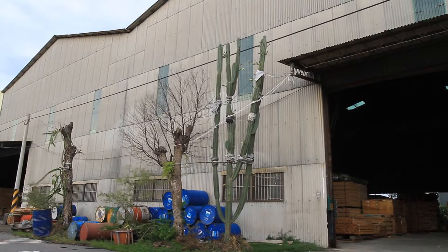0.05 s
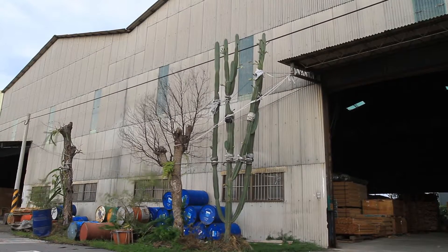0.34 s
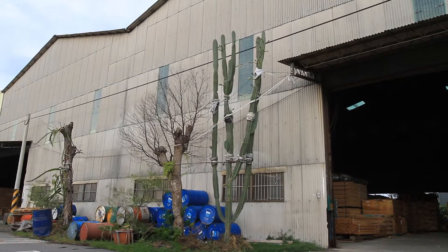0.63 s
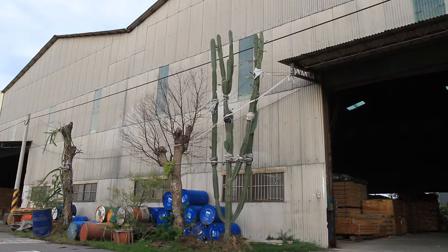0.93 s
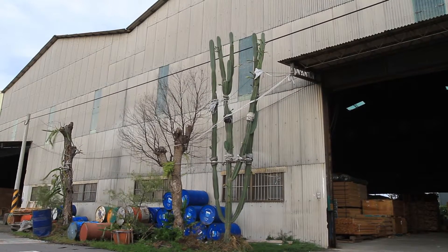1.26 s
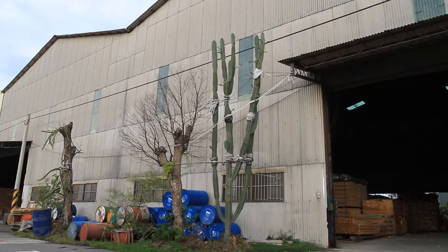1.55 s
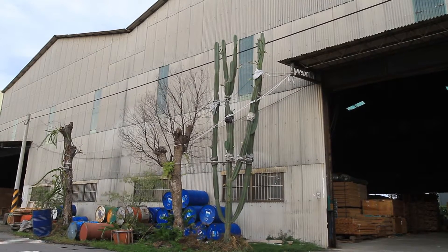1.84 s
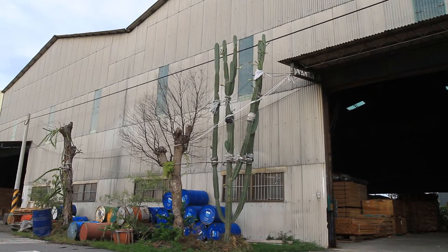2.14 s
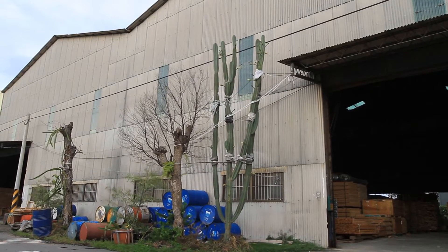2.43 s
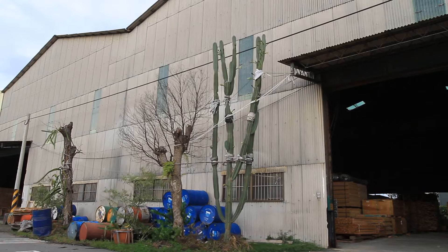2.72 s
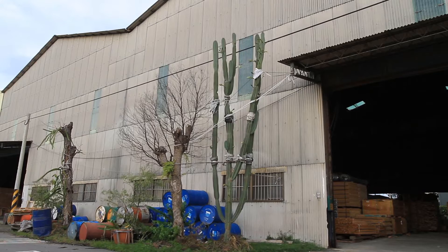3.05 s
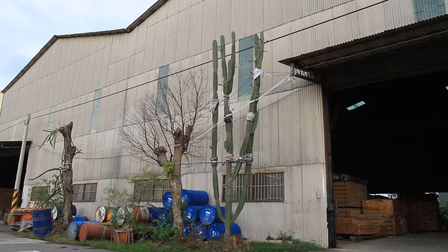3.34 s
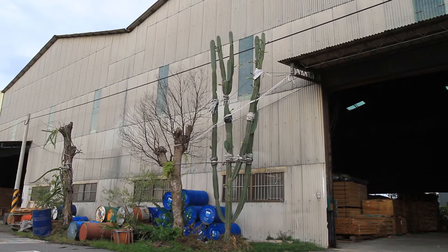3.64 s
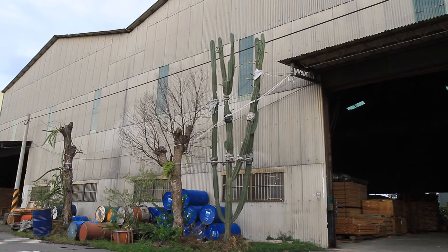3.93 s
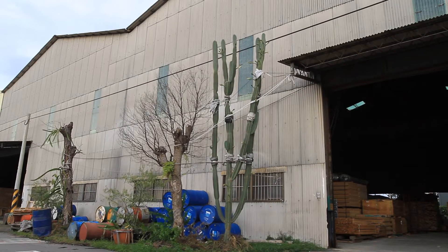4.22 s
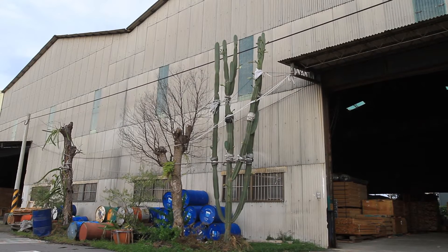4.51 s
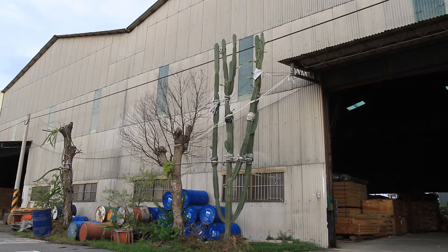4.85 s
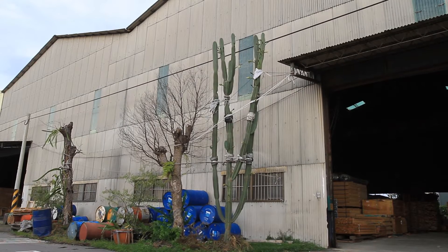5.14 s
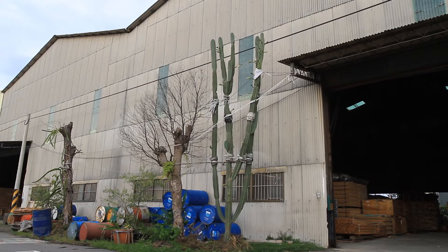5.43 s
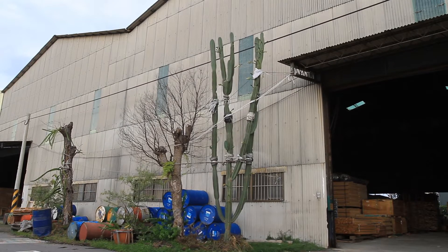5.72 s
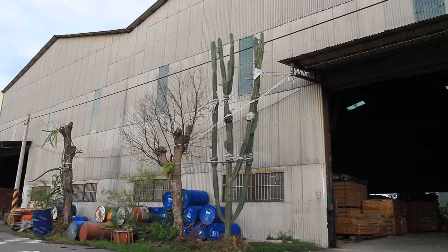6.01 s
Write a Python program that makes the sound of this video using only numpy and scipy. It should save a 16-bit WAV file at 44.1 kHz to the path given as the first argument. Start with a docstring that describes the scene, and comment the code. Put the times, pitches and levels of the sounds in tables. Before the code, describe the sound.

Gusty wind thumps the microphone outside a warehouse, over a distant whining circular saw and bursts of scraping, squeaking metal.

```python
"""Gusts thump and rumble right on the microphone, out in the yard before an open sheet-metal timber shed.
Farther off, inside, a circular saw whistles as it idles and three times sags in pitch as it bites,
its teeth striking a tone and its chips a rasp. Dragged metal scrapes, sliding metal squeaks,
and the shed rings with it all. Behind lie the shed's dull din and the hiss of wind
through branches and dry leaves. Both channels carry the same sound over their own faint hiss."""
import sys
import numpy as np
from scipy import signal
from scipy.fft import rfft, irfft, next_fast_len
from scipy.io import wavfile
from scipy.ndimage import uniform_filter1d, minimum_filter1d

SR = 44100
rng = np.random.default_rng(int(sys.argv[2]) if len(sys.argv) > 2 else 0)


def int16_out(signal):
    """Quantize to a 16-bit WAV file."""
    q = np.round(np.clip(np.atleast_2d(signal).T, -1, 1) * 32767)
    wavfile.write(sys.argv[1], SR, q.astype(np.int16))


N = 272097
TIME = np.arange(N) / SR
SIZE = next_fast_len(N, True)
BINS = np.fft.rfftfreq(SIZE, 1 / SR)

# Levels in the tables are relative; each source adds its own gain.
# ring of the shed (frequency [Hz], time to fall by 60 dB [s])
SHED_DECAY = [(200, 0.27), (2000, 0.43), (5000, 0.85), (10000, 0.38), (16000, 0.11)]
# din of the shed, heard from the yard (time [s], level [dB])
DIN_LEVEL = [(0, -49), (.16, -42), (.45, -59.5), (.62, -51.5), (.95, -50.5), (1.06, -43.5), (1.3, -51.5),
             (1.72, -45), (2.03, -46.5), (2.35, -56), (2.78, -59.5), (2.98, -51.5), (3.45, -56),
             (3.62, -50), (3.88, -55.5), (4.25, -58.5), (4.55, -48.5), (4.72, -51.5), (5.17, -49),
             (5.38, -43), (6.17, -38)]
# spectrum of the din (frequency [Hz], level [dB])
DIN_SPECTRUM = [(60, -3.5), (250, 2.5), (500, 2), (780, -0.5), (1020, 0), (1300, -4), (1900, -9),
                (2800, -16), (3900, -17), (5200, -28.5), (15000, -52.5)]
# gusts in the branches (time [s], level [dB], half length [s])
BRANCH_GUSTS = [(.13, -62.5, 0.12), (.75, -71, .17), (1.07, -59.5, 0.084), (1.5, -65, 0.12),
                (2.19, -65.5, 0.062), (2.62, -71.5, .1), (3.15, -71, 0.15), (3.9, -69, 0.17),
                (4.28, -69.5, .15), (5.08, -71.5, .19), (5.53, -64.5, 0.27), (6.1, -57, 0.18)]
# hiss of the branches (frequency [Hz], level [dB])
BRANCH_SPECTRUM = [(500, -4.5), (1300, -13.5), (2100, 3.5), (2900, -1), (4000, -2), (5000, -8),
                   (7000, -15.5), (9000, -20.5), (12000, -26), (15500, -31.5)]
# flurries of dry leaves (time [s], level [dB], half length [s])
LEAF_FLURRIES = [(.13, -72, 0.023), (5.28, -75, .04), (5.45, -70, .07), (5.5, -64, 0.017), (5.58, -71, .04)]
# hiss of the leaves (frequency [Hz], level [dB])
LEAF_SPECTRUM = [(4000, -39), (8000, -10), (10800, 4), (13000, -2), (15500, -4)]
# squeaks of sliding metal (centre time [s], length [s], pitch [Hz], level [dB], pitch scatter [Hz])
METAL_SQUEAKS = [(1.06, 0.056, 2950, -53, 30), (1.238, .08, 5700, -64, 220),
                 (1.255, 0.12, 3810, -49.5, 150), (1.269, .14, 1290, -59, 29), (1.312, 0.15, 1980, -63, 46),
                 (1.39, 0.11, 5800, -60, 250), (1.406, 0.066, 3454, -46, 172), (1.53, .05, 5440, -58, 90),
                 (2.954, .09, 1480, -53, 22), (4.96, 0.11, 8780, -81, 57), (5.101, 0.077, 3550, -60, 35),
                 (5.133, 0.15, 3010, -58, 40), (5.19, 0.092, 8850, -78, 70),
                 (5.389, 0.33, 1060, -44.5, 47.3), (5.737, .025, 3650, -34.5, 95),
                 (5.794, .028, 3540, -30, 92), (5.91, 0.058, 3330, -44, 100),
                 (6.147, 0.068, 3360, -43.5, 161)]
# drags over metal (start [s], length [s], level [dB], brightness [dB/octave])
METAL_DRAGS = [(1.124, 0.11, -38, 1.1), (1.335, 0.092, -38.5, 1.7), (5.674, 0.13, -28, 0),
               (5.82, 0.2, -34.5, 0), (6.006, 0.084, -28.5, 0)]
# spectrum of a scrape (frequency [Hz], level [dB])
SCRAPE_SPECTRUM = [(120, 6), (300, -1), (560, 3), (820, -4.5), (1050, 1), (1500, -2), (2200, -3.5),
                   (2750, -12.5), (3500, -13), (4300, -16.5), (5500, -26.5), (7500, -35.5), (10000, -43),
                   (15000, -52)]
# resonances of the scraped metal (frequency [Hz], width [Hz], level [dB])
METAL_MODES = [(961, 37, 1), (1600, 44, -16.5), (2205, 46, -3), (3220, 210, -4), (3680, 160, 6)]
# whistle of the free-running blade (time [s], level [dB])
IDLE_WHISTLE = [(0, -56), (.4, -73.5), (1.4, -71), (2.7, -76), (3.03, -62.5), (3.4, -81), (4.55, -66),
                (4.8, -64), (6.17, -60)]
# cuts of the saw (start [s], length [s], attack [s], grazing tone [dB], deep tone [dB],
# grazing rasp [dB], deep rasp [dB], fade [dB/s], time the blade sings [s])
SAW_CUTS = [(1.421, .65, 0.065, -53.5, -51, -59, -50.5, 3.5, 1.79),
            (3.35, 0.6, .04, -56, -50, -57, -51, 13.5, 3.79),
            (5.859, 0.27, 0.073, -57, -53, -65, -47.5, 2, 6.2)]
# tooth tone at first touch, a row per cut (harmonic 1 [dB], ..., harmonic 7 [dB])
GRAZE_HARMONICS = [(1, -14, -25, -23, -22, -24, -35), (-4, -9, -9.5, -20, -26, -25, -27),
                   (11, -13, -14, -13, -13, -24, -29)]
# tooth tone deep in the work, a row per cut (harmonic 1 [dB], ..., harmonic 7 [dB])
BITE_HARMONICS = [(1, -5, -16, -16, -23, -25, -32), (-1, -15.5, -19, -17, -16.5, -18, -28),
                  (-1.8, -10, -7, -20, -20, -23, -32)]
# side tones of unequal teeth (frequency [multiple of the tooth rate], level [dB])
UNEVEN_TEETH = [(12 / 9, -18), (14 / 9, -15), (15 / 9, -18), (16 / 9, -18), (21 / 9, -21), (23 / 9, -22),
                (24 / 9, -19), (30 / 9, -25), (33 / 9, -24), (42 / 9, -27), (51 / 9, -28), (60 / 9, -35)]
# rasp of the chips (frequency [Hz], level [dB])
RASP_SPECTRUM = [(500, -10), (1500, -8.5), (2200, 10), (2900, -1), (3900, 4.5), (5000, -7.5), (6500, -5),
                 (8500, -10.5), (9500, -9), (12500, -14.5), (15500, -17)]
# rasp, a row per cut (brightness [dB/octave], regular clatter over loose chips [dB])
RASP_TEXTURE = [(1, -4.5), (4.5, -2), (1.5, 0)]
# wind at the microphone (time [s], level [dB], weight of the deep rumble [dB])
WIND_STRENGTH = [(0, -27, 1), (.12, -40.5, -1.5), (.2, -24, -6.5), (.48, -24, -5), (.53, -34.5, -0.5),
                 (.69, -41, -7), (.8, -30.5, -3), (.88, -36, -4), (1.1, -33.5, -1), (1.18, -18.5, -8.5),
                 (1.34, -28.5, -2.5), (1.73, -30, -1), (1.81, -35, -9), (2.0, -26.5, -1),
                 (2.44, -29.5, -3.5), (2.51, -44, -4.5), (2.68, -32, 1), (2.78, -39, 0.5),
                 (3.24, -28.5, -4.5), (3.8, -28.5, -4), (4.58, -27.5, -5.5), (4.82, -43, -5),
                 (5.04, -36.5, -3), (5.16, -45.5, -2.5), (5.25, -34, -1), (5.43, -28, -8.5),
                 (5.78, -31, -8), (6.17, -37, -14)]
# hard buffets on the microphone (time [s], deep thump [dB], upper rumble [dB], half length [s])
MIC_BUFFETS = [(0.274, -12, -21.5, 0.0081), (0.434, -24, -21.5, 0.012), (1.18, -32, -20, .012),
               (1.714, -27.5, -25.5, 0.028), (1.99, -24, -42, 0.015), (2.07, -22, -30.5, 0.014),
               (2.182, -23.5, -30.5, 0.013), (2.352, -23.5, -44, 0.009), (2.683, -15, -24, 0.017),
               (3.259, -17.5, -19.5, .018), (3.437, -23, -41, .014), (3.547, -24.5, -31, 0.012),
               (3.639, -27, -27.5, 0.02), (3.781, -23, -20, 0.021), (4.027, -22, -22, 0.01),
               (4.572, -41, -26, .012)]
# turbulence at the microphone (frequency [Hz], level [dB])
EDDY_SPECTRUM = [(15, -15.5), (30, -26.5), (50, -4.5), (75, 0), (130, -1), (200, -5), (300, -12),
                 (420, -19), (600, -28.5), (1000, -39.5), (2000, -52), (5000, -79.5)]
# self-noise of each channel (frequency [Hz], level [dB])
SELF_NOISE_SPECTRUM = [(2000, -22.5), (8000, 3.5), (15000, 4.5)]

# the teeth graze, sink into the work, coast after the cut, and regain speed
GRAZE_S, SINK_S, COAST_S, REGAIN_S = .04, .17, .2, .1


def amp(db):
    """Decibels to gain."""
    return 10 ** (np.asarray(db) / 20)


def unit(x):
    """Scales to rms 1."""
    return x / np.sqrt(np.mean(x ** 2) + 1e-20)


def curve(rows, column=1):
    """One column of a table, joined by straight lines in time."""
    rows = np.asarray(rows)
    return np.interp(TIME, rows[:, 0], rows[:, column])


def at_frequency(points, hz):
    """A table's value at hz, joined by straight lines over log frequency."""
    frequency, value = np.transpose(points)
    return np.interp(np.log(hz + 1), np.log(frequency + 1), value)


def colour(x, spectrum, gain=1):
    """Gives x a spectrum, at rms 1."""
    return unit(irfft(rfft(x, SIZE) * amp(at_frequency(spectrum, BINS)) * gain, SIZE)[:N])


def tilt(db_per_octave):
    """Gain per frequency bin that leans a spectrum towards the treble."""
    return amp(db_per_octave * np.log2(BINS + 1))


def wander(rate_hz):
    """Random drift of rms 1, mostly slower than rate_hz."""
    return unit(irfft(rfft(rng.standard_normal(SIZE)) * np.exp(-(BINS / rate_hz) ** 2), SIZE)[:N])


def grains(per_s, spread_db):
    """Random clicks of uneven size."""
    size = amp(spread_db * np.minimum(rng.exponential(1, N), 4))
    return unit(size * rng.standard_normal(N) * (rng.random(N) < per_s / SR))


def swell(rows):
    """Power of short bell-shaped surges."""
    return sum(amp(db) ** 2 * np.exp(-((TIME - s) / half) ** 2) for s, db, half in rows)


def envelope(start, length, attack_s, release_s):
    """Rises, holds until the length is over, then dies away."""
    t = TIME - start
    return np.clip(t / attack_s, 0, 1) * np.exp(-np.maximum(t - length, 0) / release_s)


def ease(start, time_s):
    """Goes smoothly from 0 to 1, as a heavy thing gets under way."""
    return 1 - np.exp(-(np.maximum(TIME - start, 0) / time_s) ** 2)


def shed_ring(x, wet_db):
    """Direct sound plus tails that ring longest near 5 kHz; moving air shifts the paths to the yard."""
    hz, t, noise = signal.stft(rng.standard_normal((4, SR // 2)), SR, nperseg=256)
    decay = amp(-60 * t / at_frequency(SHED_DECAY, hz)[:, None])
    tails = signal.istft(noise * decay, SR, nperseg=256)[1]
    echoes = signal.oaconvolve(x[None], tails / np.linalg.norm(tails[0]), axes=1)[:, :N]
    paths = np.array([wander(rate_hz=10) for _ in echoes])
    echo = (paths * echoes).sum(0) / np.linalg.norm(paths, axis=0)
    return (x + amp(wet_db) * echo) / np.hypot(1, amp(wet_db))


def leaves():
    """Dry leaves stir in the yard in brief flurries of high hiss."""
    return colour(rng.standard_normal(N), LEAF_SPECTRUM) * np.sqrt(swell(LEAF_FLURRIES))


def branches(steady_db=-80, gain_db=10):
    """Wind in the branches around the yard: dense tiny clicks that swell with each gust."""
    rustle = colour(grains(per_s=16000, spread_db=3), BRANCH_SPECTRUM)
    return rustle * amp(gain_db) * np.sqrt(amp(steady_db) ** 2 + swell(BRANCH_GUSTS))


def shed_din(gain_db=4.5):
    """A dull, rising and falling noise carries out of the open shed."""
    noise = colour(rng.standard_normal(N), DIN_SPECTRUM)
    return noise * amp(curve(DIN_LEVEL) + gain_db + 0.85 * wander(rate_hz=19))


def squeaks(octave_db=-28, judder_db=3):
    """Sliding metal briefly locks on to one unsteady pitch; it reaches the microphone almost dry."""
    out, waver = np.zeros(N), wander(rate_hz=295)
    judder = unit(amp(judder_db * wander(rate_hz=60)))
    for centre, length, hz, db, scatter_hz in METAL_SQUEAKS:
        now = abs(TIME - centre) < length / 2
        phase = 2 * np.pi * np.cumsum(hz + scatter_hz * waver[now]) / SR
        grip = amp(db) * np.sqrt(2) * np.cos(np.pi * (TIME[now] - centre) / length)
        out[now] += grip * judder[now] * (np.sin(phase) + amp(octave_db) * np.sin(2 * phase))
    return shed_ring(out, wet_db=-18)


def scrapes(judder_db=2):
    """In the shed, dense slips of a heavy load dragged over metal ring its resonances."""
    ring = 1 + sum(amp(db) / (1 + (2 * (BINS - hz) / width) ** 2) for hz, width, db in METAL_MODES) / 2
    out = np.zeros(N)
    for start, length, db, brightness in METAL_DRAGS:
        slips = grains(per_s=4000, spread_db=0) * amp(judder_db * wander(rate_hz=84))
        drag = amp(db) * envelope(start, length, attack_s=0.033, release_s=0.026)
        out += drag * colour(slips, SCRAPE_SPECTRUM, ring * tilt(brightness))
    return shed_ring(out, wet_db=-2)


def blade(free_hz=2289, sag_hz=112.5, sag_hz_per_s=26):
    """Depth (0-1) and tooth rate: each cut drags the blade down, then the motor brings it back."""
    depth, tooth_hz = np.zeros(N), np.full(N, float(free_hz))
    for start, length, *_ in SAW_CUTS:
        load = ease(start + GRAZE_S, SINK_S) * (1 - ease(start + length + COAST_S, REGAIN_S))
        depth += load
        tooth_hz -= load * (sag_hz + sag_hz_per_s * (TIME - start))
    return depth, tooth_hz


def tooth_clatter(phase, teeth=9):
    """The same uneven pattern of strikes comes round with every group of teeth."""
    pattern = irfft(rng.standard_normal(62) + 1j * rng.standard_normal(62), 2048)
    position = phase / (2 * np.pi * teeth) % 1
    return unit(pattern[(position * len(pattern)).astype(int)])


def saw(jitter_hz=9, shake_db=3, side_db=-3, idle_octave_db=-13, dull_hz=9000):
    """Teeth strike at the blade's rate; load adds harmonics and a rasp. More echo than direct sound."""
    release_s, coast_db = .035, -16
    sing_half_s, sing_db, thin_db = 0.08, 0.5, -8.5  # as the blade sings, its rasp thins
    depth, tooth_hz = blade()
    shallow = 1 - depth
    phase = 2 * np.pi * np.cumsum(tooth_hz + jitter_hz * wander(rate_hz=103.7)) / SR
    harmonics = np.cos(np.arange(1, 8)[:, None] * phase)
    whistle = amp(curve(IDLE_WHISTLE)) * shallow * (harmonics[0] + amp(idle_octave_db) * harmonics[1])
    side_tones = amp(side_db) * sum(amp(db) * np.cos(ratio * phase) for ratio, db in UNEVEN_TEETH)
    clatter = tooth_clatter(phase)
    chips = grains(per_s=15000, spread_db=-2.5)
    teeth, rasp = np.zeros(N), np.zeros(N)
    for cut, graze, bite, texture in zip(SAW_CUTS, GRAZE_HARMONICS, BITE_HARMONICS, RASP_TEXTURE):
        start, length, attack_s, graze_db, bite_db, graze_rasp_db, bite_rasp_db, fade, sing_s = cut
        brightness, clatter_db = texture
        contact = envelope(start, length, attack_s, release_s) * amp(-fade * (TIME - start))
        coast = amp(coast_db) * envelope(start, length + COAST_S, attack_s, release_s)
        sing = np.exp(-((TIME - sing_s) / sing_half_s) ** 2)
        tone = side_tones + shallow * (amp(graze) @ harmonics) + depth * (amp(bite) @ harmonics)
        tone_db = shallow * graze_db + depth * bite_db + sing_db * sing
        teeth += np.maximum(contact, coast) * amp(tone_db) * tone
        chipping = colour(chips + amp(clatter_db) * clatter, RASP_SPECTRUM, tilt(brightness))
        rasp_gain = shallow * amp(graze_rasp_db) + depth * amp(bite_rasp_db)
        rasp += contact * rasp_gain * amp(thin_db * sing) * chipping
    # a shallow cut is duller
    dull_rasp = irfft(rfft(rasp, SIZE) / (1 + (BINS / dull_hz) ** 2), SIZE)[:N]
    tones = np.sqrt(2) * (whistle + teeth * amp(shake_db * wander(rate_hz=130)))
    return shed_ring(tones, wet_db=1.5) + shed_ring(depth * rasp + shallow * dull_rasp, wet_db=6.5)


def eddies(share):
    """One part of the turbulence spectrum, at an even strength for the gusts to shape."""
    noise = colour(rng.standard_normal(N), EDDY_SPECTRUM, share)
    window = signal.windows.hann(2601)
    return noise / np.sqrt(signal.fftconvolve(noise ** 2, window / window.sum(), "same"))


def wind_on_microphone(deep_db=-0.1, body_db=-1, buffet_db=-1, small_db=-19, small_growth=0.46):
    """Eddies press right on the microphone; the stronger ones break up into smaller, brighter ones."""
    deep_share = 1 / (1 + (BINS / 100) ** 8)  # power below 100 Hz
    strength_db = curve(WIND_STRENGTH)
    flutter = amp(2 * wander(rate_hz=40.6))
    lumps_db = 2.5 * wander(rate_hz=11)
    push = amp(strength_db + curve(WIND_STRENGTH, column=2) + deep_db + lumps_db)
    thumps = swell([(s, db + buffet_db, half) for s, db, _, half in MIC_BUFFETS])
    rumbles = swell([(s, db + buffet_db, half) for s, _, db, half in MIC_BUFFETS])
    deep_force = np.sqrt(push ** 2 + thumps) * flutter
    body_force = np.sqrt(amp(strength_db + body_db) ** 2 + rumbles) * flutter
    small = colour(rng.standard_normal(N), EDDY_SPECTRUM, BINS ** 2 / (BINS ** 2 + 350 ** 2))
    small *= amp(small_db + 2.6 * wander(rate_hz=93)) * unit(body_force) ** small_growth
    return deep_force * eddies(np.sqrt(deep_share)) + body_force * (eddies(np.sqrt(1 - deep_share)) + small)


def scene(self_noise_db=-81):
    """One microphone position in front of the shed, on both channels, over the faint hiss of each."""
    sound = wind_on_microphone() + shed_din() + branches() + leaves() + saw() + scrapes() + squeaks()
    hiss = np.array([colour(rng.standard_normal(N), SELF_NOISE_SPECTRUM) for _ in range(2)])
    return sound + amp(self_noise_db) * hiss


def record(dry, ceiling=.224, cutoff_hz=15700):
    """A limiter catches the hardest buffets; a low-pass takes off the top treble."""
    allowed = np.minimum(1, ceiling / (abs(dry).max(0) + 1e-9))
    gain = uniform_filter1d(minimum_filter1d(allowed, size=600), size=600)
    lowpass = signal.firwin(511, cutoff_hz, window=("kaiser", 9), fs=SR)
    return signal.oaconvolve(dry * gain, lowpass[None], "same")


dry = scene()
out = record(dry)
int16_out(out)
```